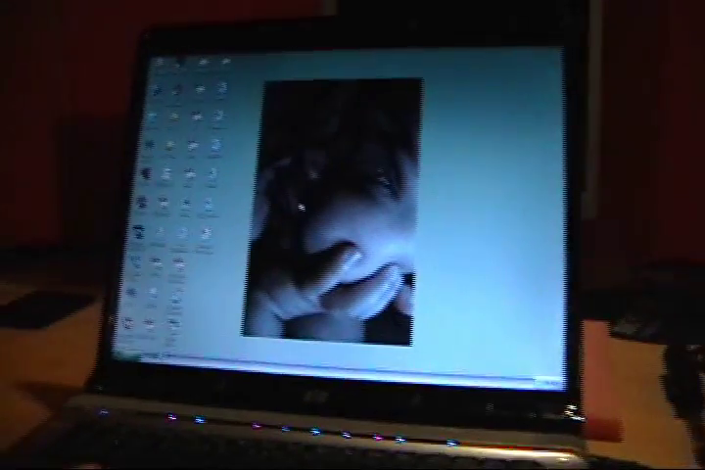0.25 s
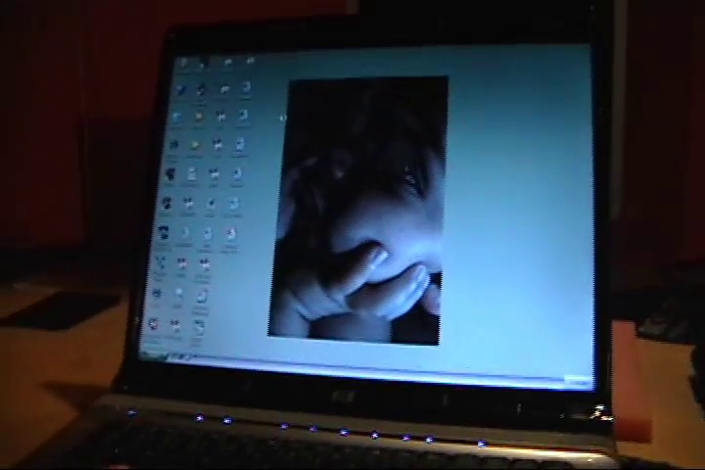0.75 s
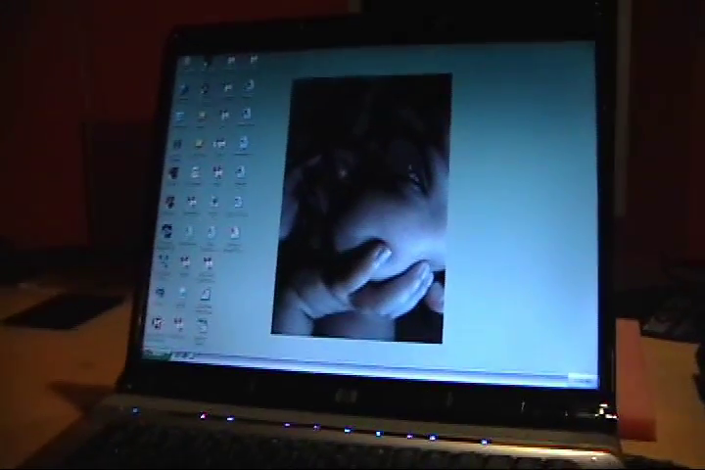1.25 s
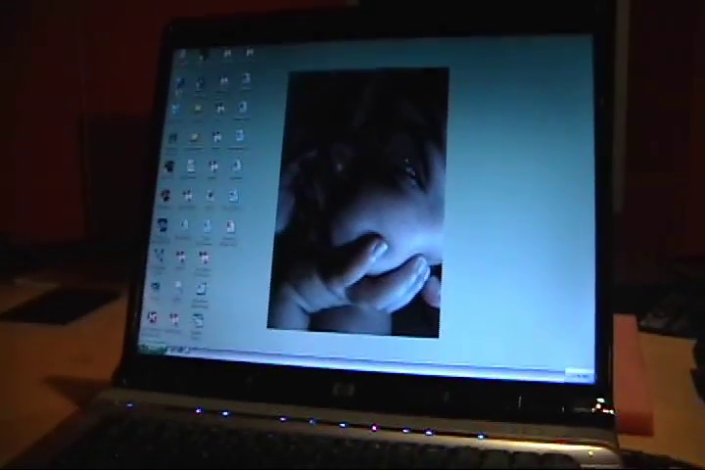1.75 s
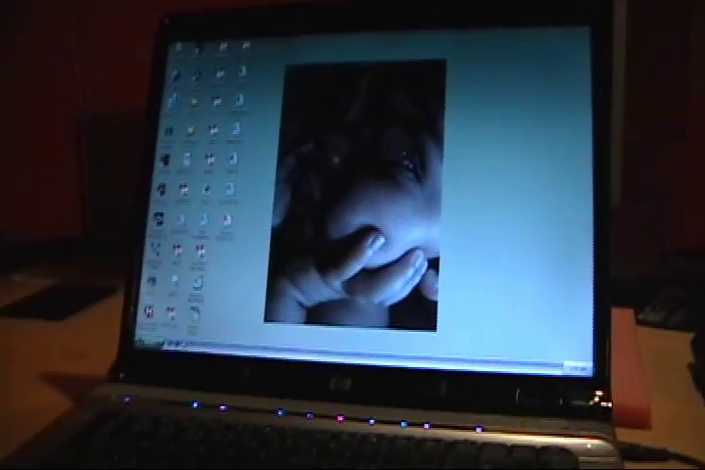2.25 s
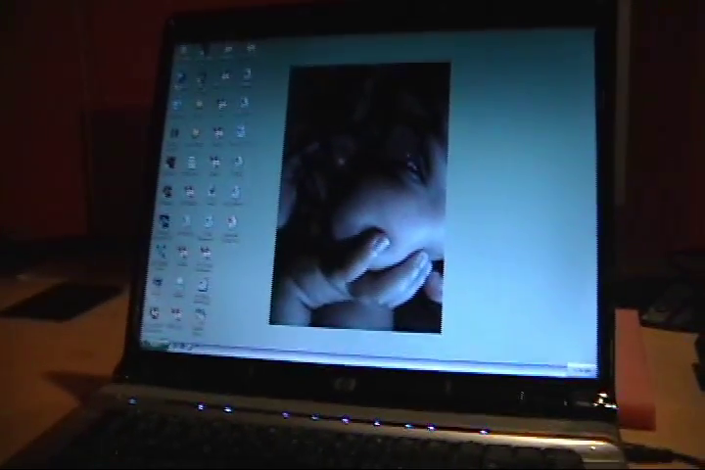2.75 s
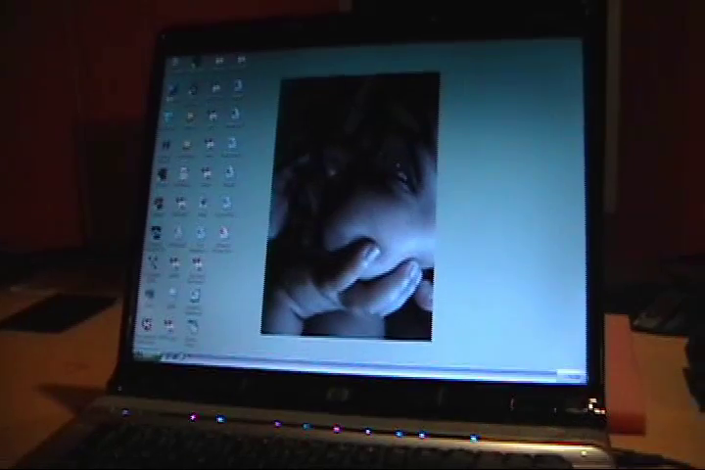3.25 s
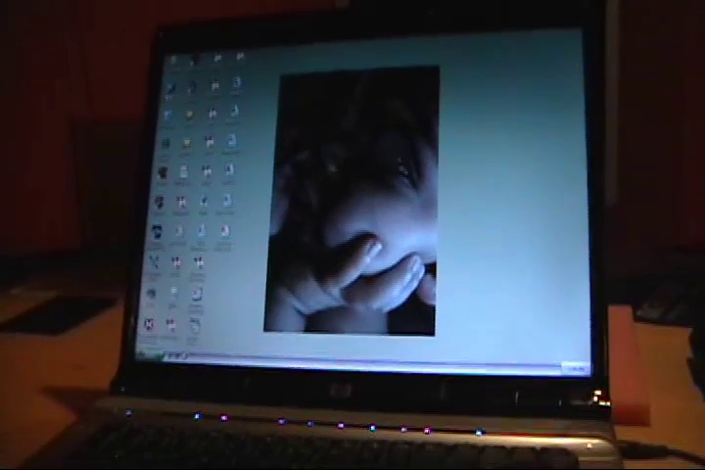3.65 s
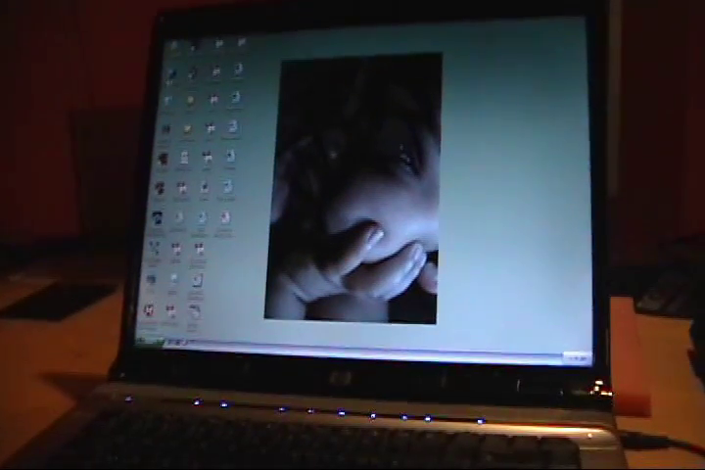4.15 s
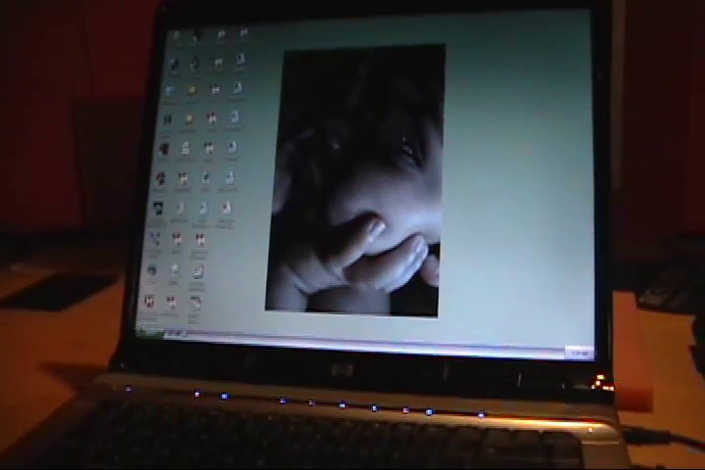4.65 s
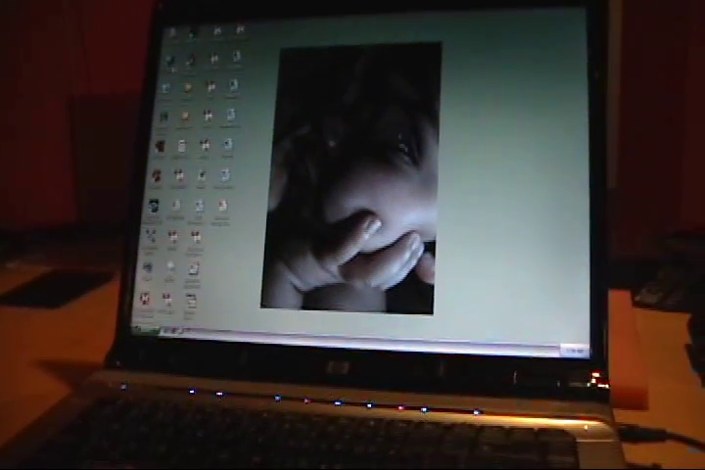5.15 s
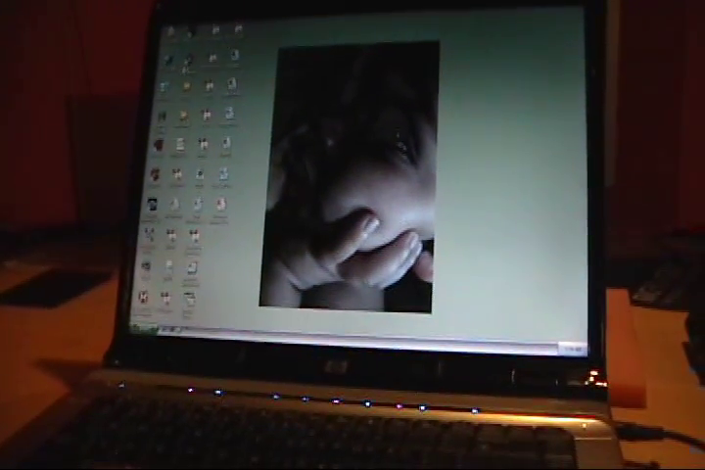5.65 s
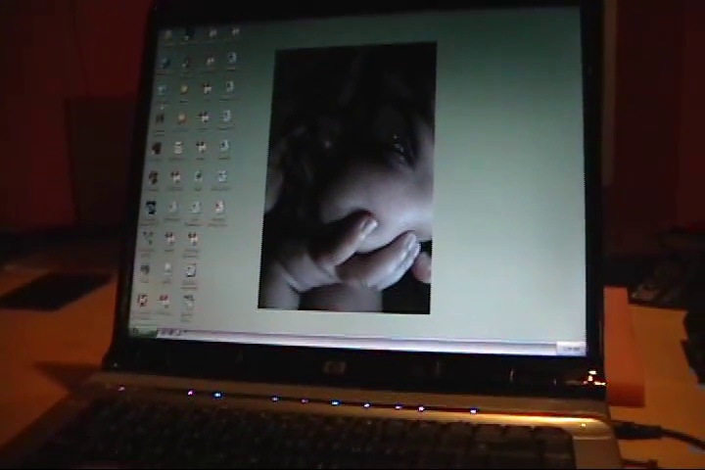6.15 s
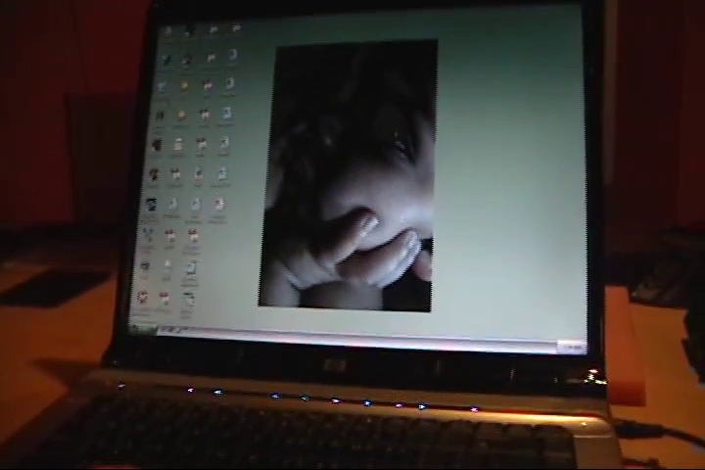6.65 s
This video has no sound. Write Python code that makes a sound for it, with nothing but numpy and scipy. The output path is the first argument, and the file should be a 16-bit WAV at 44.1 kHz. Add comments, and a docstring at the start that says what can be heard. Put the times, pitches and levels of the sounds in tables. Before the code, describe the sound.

A laptop's cooling fan runs steadily on a desk in a small room, a soft rush of air with a few faint wavering tones. Beneath it, a stronger low electrical hum throbs slightly. A few light plastic ticks come in the first second, and the hard disk chatters faintly on and off throughout. The nearby hand-held camcorder adds a fine buzz and soft hiss.

```python
"""A laptop's cooling fan runs steadily on a desk in a small room: turbulent air rushes through the vent
under a few wavering rotor tones. The hard disk chatters faintly as its arm excites the resonances of
its case, and plastic ticks a few times. Nearby motors hum and beat against the mains hum.
A hand-held tape camcorder adds the fine periodic buzz of its head drum and a soft hiss."""
import sys
import numpy as np
from scipy import signal
from scipy.fft import rfft, irfft
from scipy.io import wavfile
from scipy.ndimage import uniform_filter1d

SR = 44100
rng = np.random.default_rng(int(sys.argv[2]) if len(sys.argv) > 2 else 0)


def unload_wav(signal):
    """Save mono or channel-first audio to the path in sys.argv[1] as 16-bit WAV at rate SR, clipped to [-1, 1]."""
    wavfile.write(
        sys.argv[1],
        SR,
        np.round(np.clip(np.atleast_2d(signal).T, -1, 1) * 32767).astype(np.int16),
    )


N = 304731
TIME = np.arange(N) / SR
FREQS = np.fft.rfftfreq(N, 1 / SR)
MAINS_HZ, TOP_HZ = 59.995, 15700

# Two groups of modes of the disk's case. Each row: frequency in Hz, bandwidth in Hz, relative gain in dB.
LOWER_CASE_MODES = [(2780, 310, -10), (3900, 300, -12), (4460, 260, 3), (4620, 220, 3)]
UPPER_CASE_MODES = [(5330, 140, -9), (5690, 160, 0), (6030, 180, -6.5), (6430, 260, -11.5),
                    (7440, 150, -11)]


def undb(db):
    """Amplitude ratio of a level in decibels."""
    return 10 ** (np.asarray(db) / 20)


def stereo(mid, side):
    """Left and right are the sum and the difference of mid and side."""
    return np.array([mid + side, mid - side])


def curve(table):
    """Linear interpolation in time between rows of seconds and value."""
    return np.interp(TIME, *np.transpose(table))


def spectrum(table, hz):
    """Mid and side gains, interpolated in dB over log frequency."""
    points, *columns = np.transpose(table)
    return undb([np.interp(np.log(np.maximum(hz, 1)), np.log(points), db) for db in columns])


def noise(table):
    """Uncorrelated mid and side noise, filtered to a given spectral density."""
    return irfft(rfft(rng.standard_normal((2, N))) * spectrum(table, FREQS), N) * np.sqrt(SR / 2)


def resonate(x, modes):
    """Modal superposition: damped resonators respond in parallel to one force."""
    size = x.shape[-1]
    f = np.fft.rfftfreq(size, 1 / SR)
    response = sum(undb(db) * 1j * f * width / (hz ** 2 - f ** 2 + 1j * f * width)
                   for hz, width, db in modes)
    return irfft(rfft(x) * response, size)


def waver(rate_hz, size=2048):
    """Low-pass noise of unit variance: a smooth random fluctuation."""
    hz = np.fft.rfftfreq(size, N / SR / size)
    x = irfft(rfft(rng.standard_normal(size)) * np.exp(-(hz / rate_hz) ** 2))
    return np.interp(TIME, np.linspace(0, N / SR, size), (x - x.mean()) / x.std())


def tone(hz, db, side_db):
    """A sinusoid of given rms level; room reflections shift its phase between the channels."""
    phase = 2 * np.pi * (np.cumsum(hz) / SR + rng.random())
    return np.sqrt(2) * undb(db) * stereo(np.sin(phase), undb(side_db) * np.cos(phase))


def head_drum(turn_hz=149.85, scrape_turns=0.09, second_head_turns=.42, second_db=-2., size=4096):
    """Periodic friction: two heads brush the tape on every turn, giving a harmonic buzz."""
    # Envelope of the harmonics. Each row: frequency in Hz, mid level in dB, side level in dB.
    buzz = [(1000, -84, -92), (3480, -84.5, -82), (4900, -87.5, -106), (6940, -100, -105),
            (8200, -91.5, -102), (9900, -100, -101), (10900, -94, -84), (12600, -90.5, -104),
            (13750, -83.5, -115), (14450, -93, -125), (15500, -101, -135)]
    # Prominent harmonics. Each row: harmonic number, mid level in dB, side level in dB.
    strong_harmonics = [(2, -74, -77), (3, -70, -74), (4, -72, -78), (6, -70, -77), (12, -79, -83),
                        (14, -71, -91), (16, -72, -82), (20, -90, -79), (22, -90, -82), (36, -84, -93),
                        (38, -81, -87), (40, -85, -93), (42, -87, -97), (50, -85, -92), (52, -85, -101),
                        (54, -81, -94), (62, -86, -84), (86, -81, -100), (88, -83, -114)]
    turn = np.arange(size) / size
    second_contact = undb(second_db) * np.exp(-((turn - second_head_turns) % 1) / scrape_turns)
    contact = np.exp(-turn / scrape_turns) + second_contact
    scrape = rfft(contact * rng.standard_normal((2, size)))
    harmonic = np.arange(size // 2 + 1)
    gain = spectrum(buzz, harmonic * turn_hz)
    for k, mid_db, side_db in strong_harmonics:
        gain[:, int(round(k))] = undb([mid_db, side_db])
    gain *= (harmonic > 1) & (harmonic * turn_hz < TOP_HZ)
    cycles = irfft(gain * scrape / abs(scrape)) * size / np.sqrt(2)  # the scrape sets only the phases
    return stereo(*(np.interp(TIME * turn_hz % 1, turn, cycle) for cycle in cycles))


def distant_machines(waver_db=-1.6, drift=0.00055):
    """Slow modulation of pitch and level makes the weaker motor tones throb."""
    # Each row: frequency in Hz, level in dB, side relative to mid in dB.
    hum_tones = [(54.1, -68, -27), (80.2, -54.5, -20), (104.2, -53, -26), (135.9, -54, -29),
                 (155.9, -59, -22), (172.5, -62, -20), (200.2, -52, -17), (255.8, -56.5, -22)]
    return sum(tone(hz * (1 + drift * waver(0.43)), db + waver_db * waver(1.0), side_db)
               for hz, db, side_db in hum_tones)


def iron_hum(phase, hum_db, octave_db, side_db):
    """Magnetic force pulls iron twice per cycle; a phase-locked octave flattens the crests."""
    wave = np.sqrt(2) * (undb(hum_db) * np.exp(2j * phase) - undb(octave_db) * np.exp(4j * phase))
    return stereo(wave.real, undb(side_db) * wave.imag)


def mains_hum(waver_db=0.4):
    """Forced vibration at twice the mains frequency gives the strongest hum."""
    hum = iron_hum(2 * np.pi * MAINS_HZ * TIME, hum_db=-34.5, octave_db=-45.5, side_db=-20.5)
    return hum * undb(waver_db * waver(4.1))


def induction_motor(motor_hz=58.589, in_phase_s=.364):
    """Beats: the motor slips just behind the mains, so their hums reinforce and oppose in turn."""
    slip_cycles = (MAINS_HZ - motor_hz) * (TIME - in_phase_s)
    phase = 2 * np.pi * (MAINS_HZ * TIME - slip_cycles)
    return iron_hum(phase, hum_db=-50.5, octave_db=-47.8, side_db=-19.)


def plastic_ticks(tail_s=0.005, tail_db=-27.0):
    """Impulse response: a blunt snap with a faint noisy tail excites heavily damped modes of plastic."""
    # Each row: start in seconds, relative level in dB.
    snaps = [(.2402, -27.5), (.7254, -30.5), (.7425, -38), (.823, -39)]
    # Each row: frequency in Hz, bandwidth in Hz, gain in dB.
    plastic_modes = [(2500, 700, 7), (3800, 900, -3), (5200, 1600, -3), (7900, 1500, 5), (9800, 1400, 3)]
    force = np.zeros((2, N))
    for start, db in snaps:
        age = np.maximum(TIME - start, 0)
        tail = (age > 0) * undb(db + tail_db) * np.exp(-age / tail_s)
        force += tail * rng.standard_normal((2, N)) * [[1], [.5]]  # mid, side
        force[0, int(start * SR)] += undb(db)
    blunt = uniform_filter1d(uniform_filter1d(force, size=2), size=2)
    return stereo(*resonate(blunt, plastic_modes))


def disk_activity(idle_db=-76.5, ramp_s=0.031):
    """Incoherent addition: the powers of idling and of each spell of work sum to the arm's envelope."""
    # Spells of reading or writing. Each row: start in seconds, length in seconds, relative level in dB.
    spells = [(0.1, 0.17, -71), (.72, .24, -69.5), (1.44, 0.12, -71), (2., 0.17, -75), (2.64, 0.12, -71),
              (3.2, .3, -75), (4.03, 0.28, -76), (4.46, 0.15, -70), (4.723, 0.3, -74), (5.21, .15, -74),
              (5.828, 0.31, -71), (6.37, .28, -69), (6.717, .17, -72)]
    power = undb(idle_db) ** 2
    for start, length, db in spells:
        inside_s = np.minimum(TIME - start, start + length - TIME)
        power = power + undb(db) ** 2 * np.clip(.5 + inside_s / ramp_s, 0, 1)
    return np.sqrt(power)


def disk_chatter(moves_per_s=190, spread_db=1.5, upper_db=-1.5, lower_db=-2.5, side_db=-15.0):
    """Shot noise: short random moves of the arm ring the case, whose upper modes follow the work."""
    # Envelope of the lower modes. Each row: time in seconds, relative level in dB.
    lower_levels = [(0, -70), (.55, -71), (1.2, -76), (2.45, -83), (2.65, -68), (2.95, -71.5), (3.25, -70),
                    (3.6, -70), (3.95, -75), (4.15, -71), (6.91, -72.5)]
    moves = rng.random(N) < moves_per_s / SR
    impulses = moves * undb(spread_db * rng.uniform(-1, 1, (2, N))) * rng.choice([-1, 1], (2, N))
    lower = resonate(impulses, LOWER_CASE_MODES)
    lower = lower / lower.std() * undb(curve(lower_levels) + lower_db)
    upper = resonate(impulses, UPPER_CASE_MODES)
    upper = upper / upper.std() * disk_activity() * undb(upper_db)
    mid, side = lower + upper
    return stereo(mid, undb(side_db) * side)


def disk_seeks(push_s=.0012, averaging_s=.004, push_hz=5200, push_width_hz=2400, size=1024):
    """Transient excitation: each longer move of the arm rings the case with a brief, rough push."""
    # Each row: start in seconds, level of the upper modes in dB, level of the lower modes in dB.
    seeks = [(0.1961, -62, -66), (0.3222, -63, -72), (.503, -72, -63), (0.5915, -69, -65),
             (0.6017, -74, -62), (0.7687, -67, -67), (0.9265, -65, -65), (1.4839, -63, -64),
             (2.016, -63, -68), (2.6985, -64, -65), (3.0148, -58, -67), (3.0267, -62, -63),
             (3.121, -72, -62), (3.2016, -75, -63), (3.2631, -65, -61), (3.2876, -68, -62),
             (3.3245, -63, -70), (3.3651, -65, -62), (3.47, -64, -65), (3.8697, -63, -66),
             (4.048, -64, -63), (4.0867, -65, -70), (4.2136, -65, -63), (4.3047, -63, -66),
             (4.3254, -60, -68), (4.3535, -65, -64), (4.4892, -66, -67), (4.5391, -61, -62),
             (4.584, -62, -65), (4.5971, -63, -63), (4.7906, -64, -68), (4.8001, -62, -71),
             (4.9199, -60, -69), (5.337, -72, -63), (5.379, -69, -62), (5.621, -70, -62),
             (5.7425, -67, -63), (5.8691, -61, -64), (5.9437, -59.5, -62), (6.0339, -65, -66),
             (6.4625, -61, -68), (6.4908, -63, -59), (6.5402, -63, -66), (6.606, -62, -72),
             (6.6181, -62, -63), (6.6383, -65, -62), (6.7902, -68, -64), (6.8066, -62, -60),
             (6.865, -66, -62)]
    out = np.zeros(N + size)
    age = np.arange(size) / SR
    bursts = age * np.exp(-age / push_s) * rng.standard_normal((len(seeks), size))
    pushes = resonate(bursts, [(push_hz, push_width_hz, 0)])
    for (start, upper_db, lower_db), push in zip(seeks, pushes):
        first = int(start * SR)
        for modes, db in ((UPPER_CASE_MODES, upper_db), (LOWER_CASE_MODES, lower_db)):
            knock = resonate(push, modes)
            out[first:first + size] += undb(db) * knock * np.sqrt(averaging_s * SR / np.sum(knock ** 2))
    return out[:N]


def vent_airflow(gain_db=-0.36, swell_db=0.46, width_hz=17, lift_db=0.84, pan_db=-2.0, pan_hz=1100):
    """Turbulence gives broadband noise, which whirs in narrow resonances of the vent and the room."""
    # Each row: frequency in Hz, relative mid and side spectral densities in dB.
    turbulence = [(24.6, -95, -100), (59, -75.5, -90), (107, -66, -87.5), (246, -65.5, -90),
                  (315, -72.5, -81), (362, -74, -84), (446, -73.5, -81.5), (568, -80.5, -88),
                  (640, -78, -89), (846, -81.5, -89), (1210, -85, -91.5), (1297, -81.5, -92.5),
                  (1440, -85.5, -91.5), (2160, -91.5, -96), (2640, -93, -99), (2990, -97, -101.5),
                  (9400, -125, -125)]
    # Each row: frequency in Hz, height of the peak in multiples of lift_db.
    resonances = [(280, 2), (445, 1.5), (472, 2.5), (562, 4), (640, 2), (695, 3.5), (788, 1.5), (855, 3),
                  (888, 4), (985, 3), (1067, 5), (1155, 3.5), (1260, 3), (1320, 2), (1367, 3), (1435, 4.5),
                  (1562, 4), (1740, 2), (1855, 3), (2160, 2)]
    rush = stereo(*noise(turbulence))
    peaks = sum(height * np.exp(-((FREQS - hz) / width_hz) ** 2) for hz, height in resonances)
    treble = FREQS ** 2 / (FREQS ** 2 + pan_hz ** 2)
    pan = undb(np.array([[.5], [-.5]]) * pan_db * treble)  # the treble lies slightly to the right
    whir = irfft(rfft(rush) * undb(lift_db * peaks) * pan, N)
    return whir * undb(gain_db + swell_db * waver(0.61))


def fan_tones(low_hz=391.4, rest_db=-57.5, swell_s=0.094, wander=0.0008, flutter=0.0011, waver_db=1.5):
    """Tonal rotor noise: all pitches follow the wandering speed, and turbulence shakes each on its own."""
    # Swells of the lower main tone. Each row: time of the crest in seconds, level in dB.
    swells = [(.17, -48.5), (.65, -49), (1., -49), (1.4, -49.5), (1.61, -50), (1.95, -50), (2.37, -49.5),
              (2.92, -48.5), (3.2, -52), (3.55, -50), (4.05, -47.5), (4.35, -54), (4.82, -52), (5.25, -49),
              (5.7, -51.5), (6.1, -48.5), (6.45, -51), (6.88, -51)]
    # The higher main tone, growing near the end. Each row: time in seconds, frequency in Hz, level in dB.
    whine = [(0, 752, -58.3), (1.5, 754.5, -58.3), (2.8, 754, -58.8), (3.3, 751.5, -57.5),
             (4.5, 752.5, -59.5), (5.4, 752.5, -57.5), (5.7, 755, -57.3), (6.91, 755, -55)]
    # Tones of the fan and its housing. Each row: frequency in Hz, level in dB, side relative to mid in dB.
    weak_tones = [(344.2, -62, -12), (351, -61.5, -19), (375.6, -63, -12), (425.3, -70, 9), (456, -74, 12),
                  (480, -66, -19), (526, -65, -21), (701, -68.5, -22), (769, -70, -18), (852, -68, -20),
                  (1062, -75, -12), (1320, -74, -9), (1592, -69, -9), (1677, -71.5, -17), (1955, -73, -6),
                  (4330, -83, -12)]
    speed = 1 + wander * waver(0.936)
    rest = undb(rest_db)
    throb = rest + sum((undb(db) - rest) * np.exp(-((TIME - crest) / swell_s) ** 2)
                       for crest, db in swells)
    whine_hz, whine_db = (curve(np.array(whine)[:, [0, k]]) for k in (1, 2))
    partials = [(low_hz, 20 * np.log10(throb), -11), (whine_hz, whine_db, -14)]
    partials += [(hz, db + waver_db * waver(3.1), side_db) for hz, db, side_db in weak_tones]
    return sum(tone(hz * (speed + flutter * waver(9.4)), db, side_db) for hz, db, side_db in partials)


def scene():
    """Superposition: the pressures from the motors, the laptop and the head drum add."""
    hum = mains_hum() + induction_motor() + distant_machines()
    laptop = fan_tones() + vent_airflow() + disk_chatter() + disk_seeks()
    return hum + laptop + head_drum() + plastic_ticks()


def record(dry):
    """The microphone's self-noise adds hiss, and a steep low-pass filter limits the bandwidth."""
    # Each row: frequency in Hz, mid and side spectral densities in dB.
    hiss = [(2000, -106, -110), (4500, -103, -107), (5170, -105, -110), (7550, -104.5, -108),
            (10000, -109, -110.5), (11900, -108.6, -115), (13100, -107, -128), (14400, -113.8, -132),
            (15600, -119, -140)]
    low_pass = signal.ellip(10, .1, 80, TOP_HZ, fs=SR, output="sos")
    return signal.sosfilt(low_pass, dry + stereo(*noise(hiss)))


dry = scene()
out = record(dry)
unload_wav(out)
```